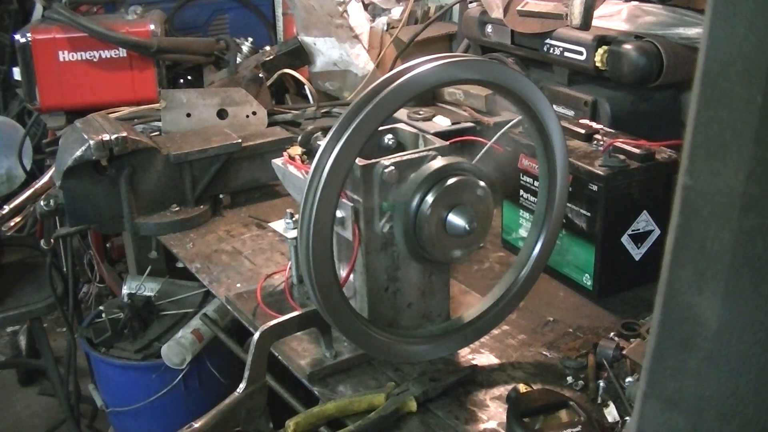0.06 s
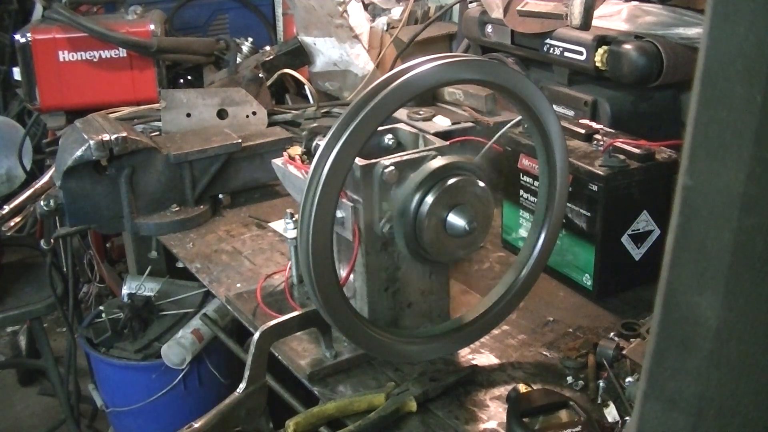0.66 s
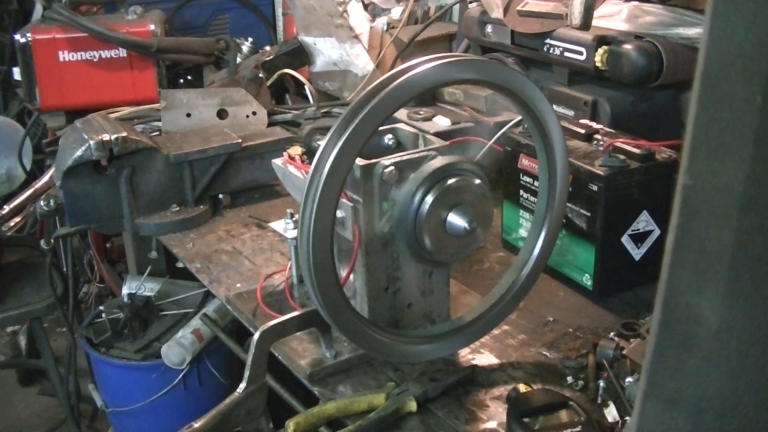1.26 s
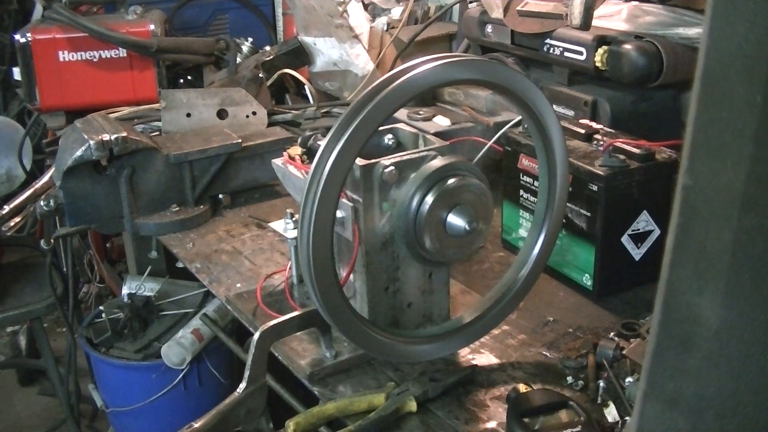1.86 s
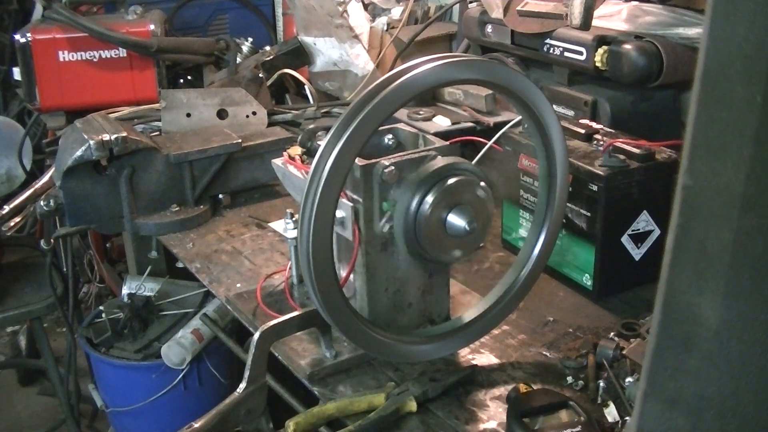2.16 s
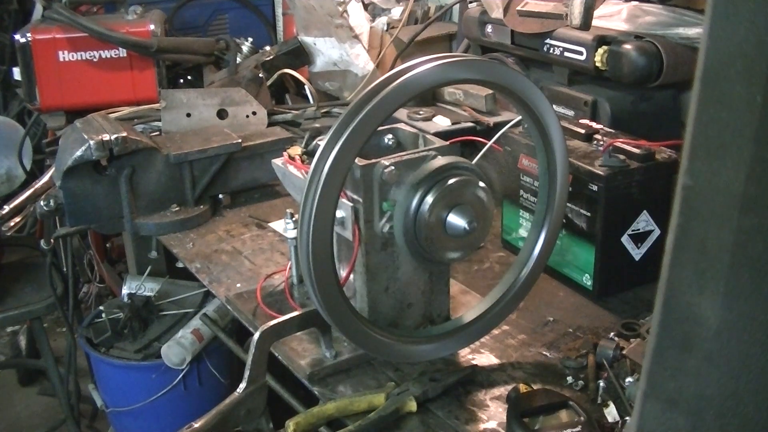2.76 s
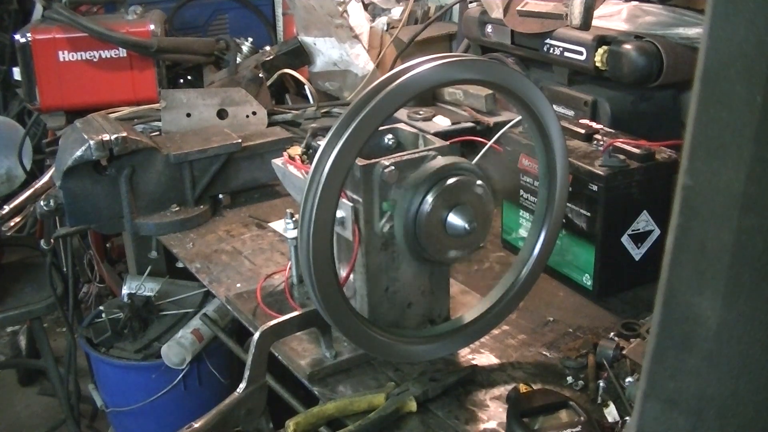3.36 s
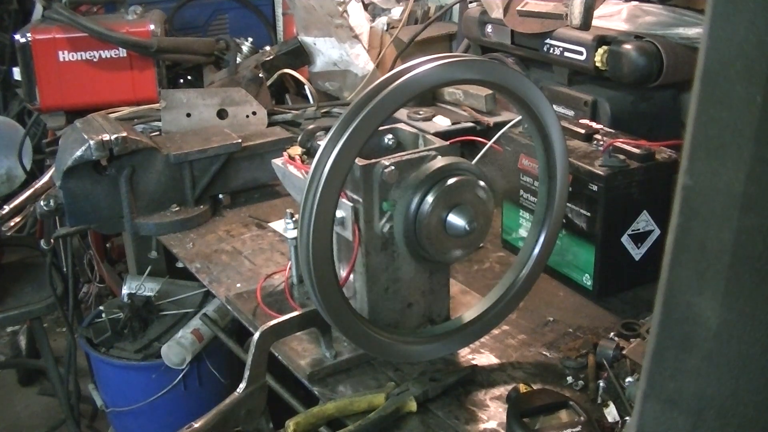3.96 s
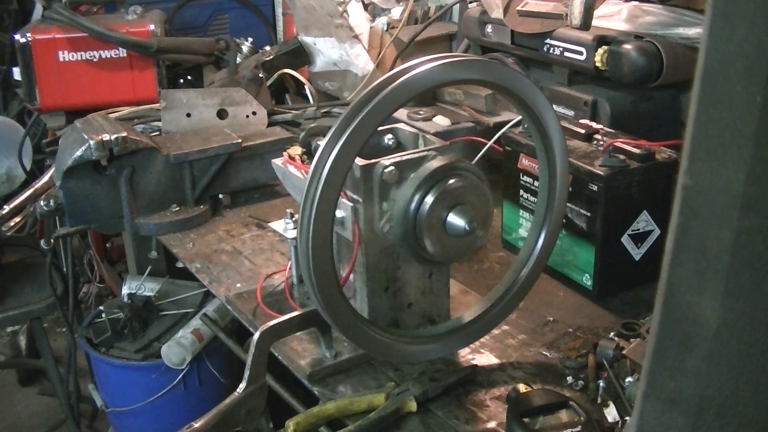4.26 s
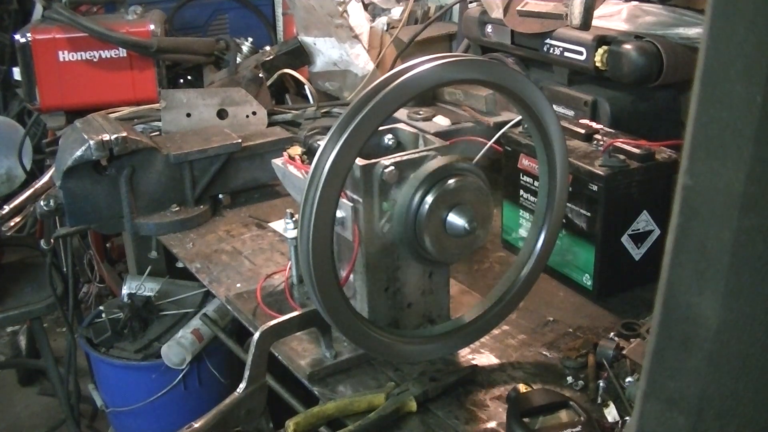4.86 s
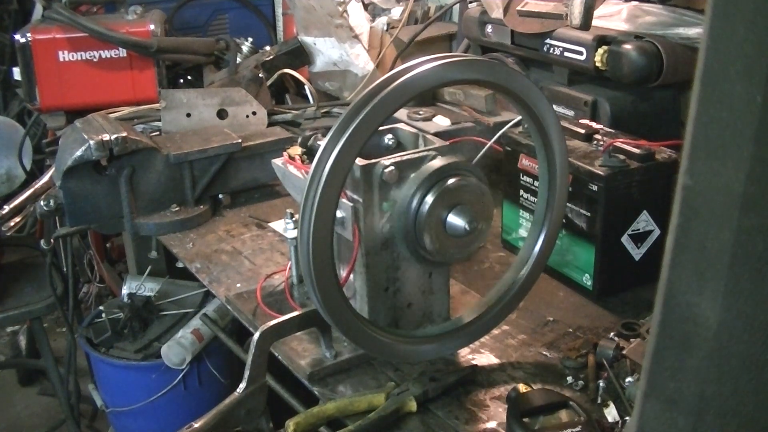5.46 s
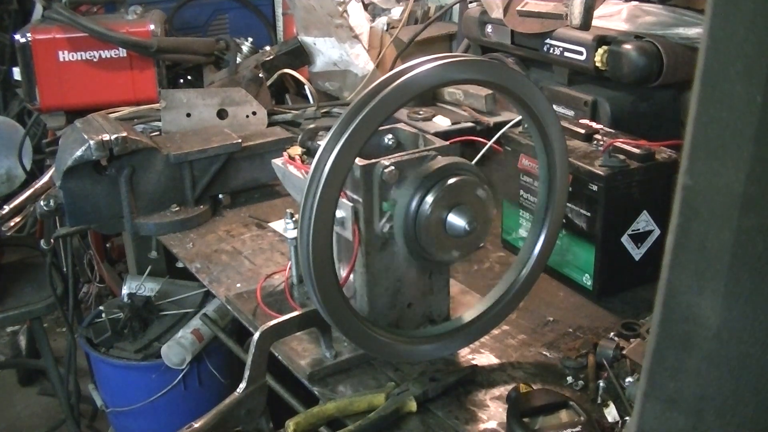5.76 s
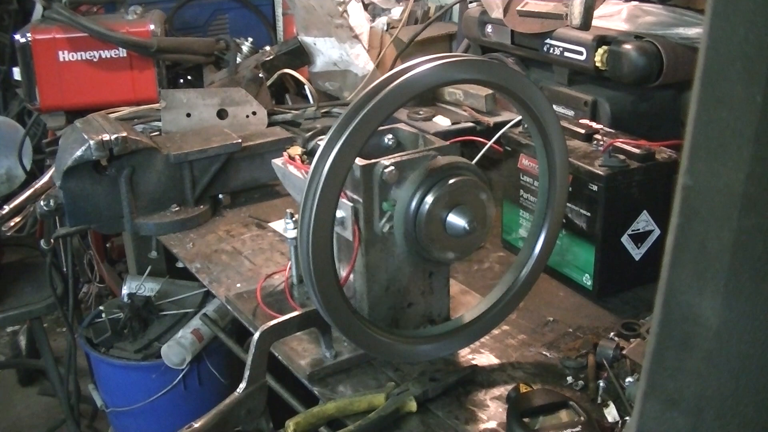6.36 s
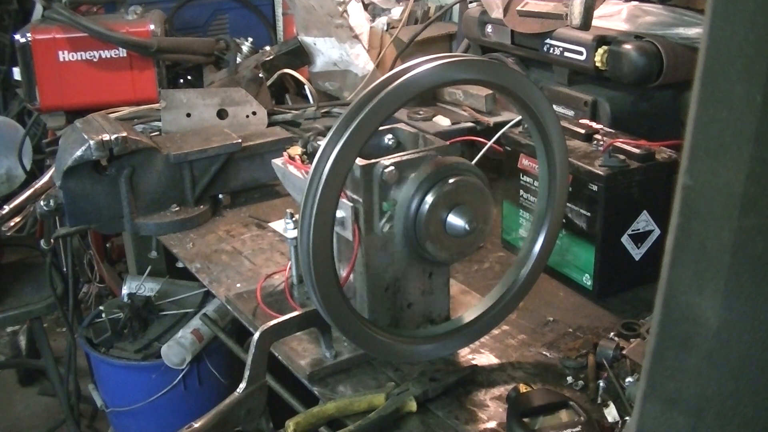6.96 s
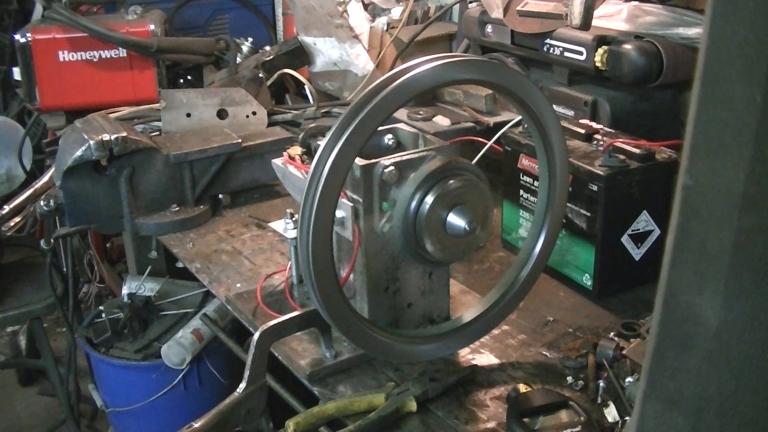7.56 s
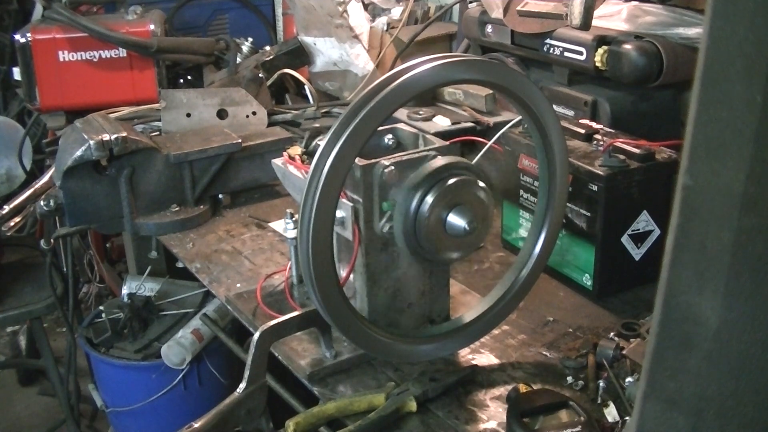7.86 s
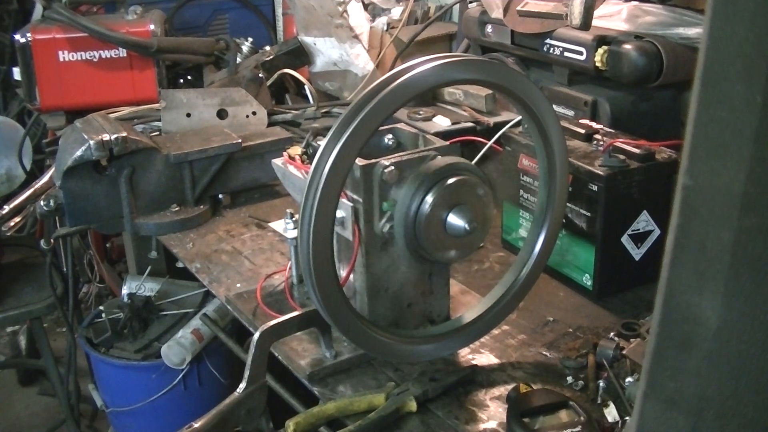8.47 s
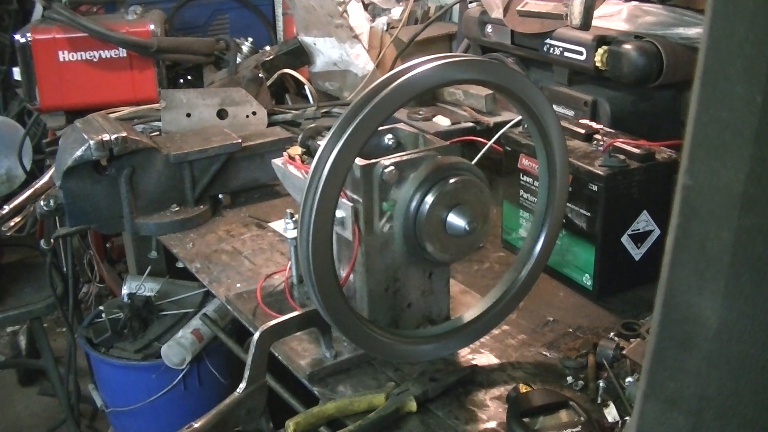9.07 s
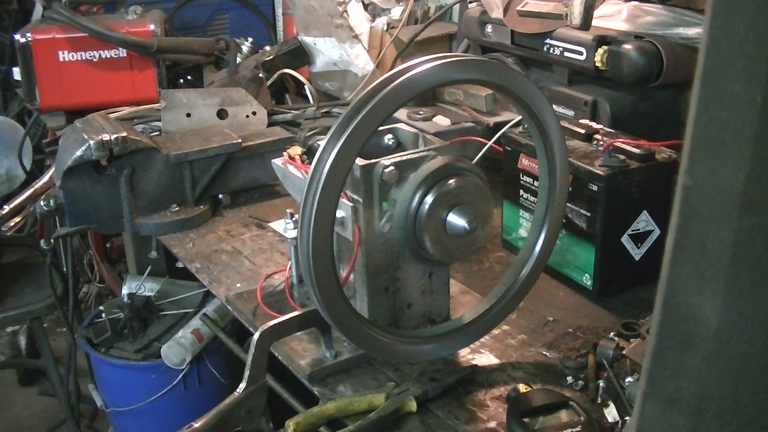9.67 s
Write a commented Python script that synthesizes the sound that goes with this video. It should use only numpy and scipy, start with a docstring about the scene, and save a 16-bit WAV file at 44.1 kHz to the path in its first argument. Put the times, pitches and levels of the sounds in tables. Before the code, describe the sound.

Fast, even mechanical clattering comes from a small flywheel engine close to the microphone. Its steel rods and pins click, rattle and ring on every turn while the bench knocks beneath them. A soft steady whir from the wheel and bearings lies under the clacking, with faint tones swelling and fading. It runs without a break, and the small workshop adds a short echo.

```python
"""A small cluttered workshop: a homemade solenoid engine on the bench turns its flywheel about seven
times a second, slowly gaining speed. Each turn, switch, plunger and loose linkage make the same run of
contacts: one clatter on the pull, one on the return. They knock the bench and ring the steel frame,
rods and pins, and the room answers. Underneath, the wheel whirs and faint pitches swell and fade."""
import sys
import numpy as np
from scipy import signal
from scipy.fft import rfft, irfft, next_fast_len
from scipy.io import wavfile
from scipy.ndimage import uniform_filter1d

SR = 44100
rng = np.random.default_rng(int(sys.argv[2]) if len(sys.argv) > 2 else 0)


def transcribe(signal):
    """Save signal, clipped to [-1, 1], as a 16-bit WAV file at the path in sys.argv[1]."""
    frames = np.atleast_2d(signal).T
    limited = np.clip(frames, -1, 1)
    pcm = np.round(limited * 32767).astype(np.int16)
    wavfile.write(sys.argv[1], SR, pcm)


N = 427769

# Contacts of one turn: switch and pull, return stroke, linkage rattle, light ticks while coasting.
# Each row: delay in seconds, chatter life in seconds, relative levels in dB for bench, frame, rods,
# and pins and clicks, then looseness from 0 to 1.
CONTACTS = [ (-.0006, .0034, -13, -8.5, -1.5, -2.5, 0), (.0013, 0.002, -12, -7.5, 1, -2.5, 0),
            (.0082, .0022, -6, -4, 1.5, 0.5, .2), (0.0125, 0.0034, -4, -3.5, -2, -6.5, 0.4),
            (.0187, 0.0035, -1.5, -2.5, 2.7, 4.5, 0), (.0259, .0023, -3.5, -10, -6, -7, 0.03),
            (0.0343, 0.0037, -7, -6.5, -3, -8, 0), (0.0435, 0.00099, -4.5, -4.5, 3.5, -8, 0),
            (0.0507, .0032, -10.5, -2, -7, -3, 0.1), (0.0538, 0.007, -1.5, 0.5, 0.5, 2.5, 0),
            (0.0654, 0.0022, -2, -5.5, -10, -20, 0.02), (.074, .0044, -8, -7, -6.5, -32, 0),
            (0.0788, 0.0058, -12.5, -4.5, -8.5, -22, 1), (0.0873, .0038, -8.5, -6.5, -14, -27, .8),
            (0.0959, .007, -10, -13, -4.5, -11, .2), (.112, 0.0069, -16.5, -17, -24, -13, 0),
            (.121, .0045, -16, -24, -15, -9, 0.02)]
DELAY_S, LIFE_S, BENCH_DB, FRAME_DB, ROD_DB, CLICK_DB, LOOSENESS = np.transpose(CONTACTS)
TURN_COUNT = 71


def amp(db):
    """Decibels to gain."""
    return 10 ** (np.asarray(db) / 20)


def unit(x):
    """Scaled to rms 1."""
    return x / np.sqrt(np.mean(x ** 2) + 1e-20)


def along(points, hz):
    """(Hz, value) points interpolated on a log frequency axis."""
    knots_hz, values = np.transpose(points)
    return np.interp(np.log(hz + 1), np.log(knots_hz + 1), values)


def filtered(x, response):
    """x through a gain given as a function of Hz."""
    size = next_fast_len(N + SR // 2)
    return irfft(rfft(x, size) * response(np.fft.rfftfreq(size, 1 / SR)), size)[:N]


def ringing(modes, size=16384):
    """Impulse response of a body whose modes alternate in polarity."""
    hz = np.fft.rfftfreq(size, 1 / SR)
    spectrum = 0
    for k, (mode_hz, width_hz, db) in enumerate(modes):
        damping = 1j * hz * width_hz
        spectrum += (-1) ** k * amp(db) * damping / (mode_hz ** 2 - hz ** 2 + damping)
    return irfft(spectrum)


def snap(colour, size=2048):
    """Minimum-phase impulse with this (Hz, dB) colour."""
    gain = amp(along(colour, np.fft.rfftfreq(size, 1 / SR)))
    cepstrum = irfft(np.log(gain))
    cepstrum[1:size // 2] *= 2
    cepstrum[size // 2 + 1:] = 0
    return irfft(np.exp(rfft(cepstrum)))


def turn_starts():
    """Start of each flywheel turn in seconds; each is slightly shorter than the last."""
    first_s, turn_s, quicken_s = -0.06787, 0.139851, 0.0000473
    k = np.arange(TURN_COUNT)
    return first_s + turn_s * k - quicken_s * k * (k - 1) / 2


def contact_times():
    """Seconds, turns x contacts: set crank angles, shifted by switch jitter and wandering joint play."""
    jitter_s, tight_play_s, loose_play_s = 0.0003, 0.0004, 0.0008
    starts_s = turn_starts()
    period_s = np.gradient(starts_s)
    play = rng.standard_normal((TURN_COUNT, len(CONTACTS)))
    wander = unit(uniform_filter1d(play, size=3, axis=0, mode="wrap"))
    closing_s = starts_s + jitter_s * rng.standard_normal(TURN_COUNT)
    crank_s = np.outer(period_s / period_s.mean(), DELAY_S)
    return closing_s[:, None] + crank_s + (tight_play_s + loose_play_s * LOOSENESS) * wander


def contact_forces():
    """Relative dB, turns x contacts: the solenoid's pull varies a little, the loose joints much more."""
    # Slow drift of the pull. Each row: time in seconds, level in dB.
    drift = [(0, -0.6), (1.6, -1.06), (2.25, 0.1), (3.1, -1.3), (4.1, -0.46), (4.7, -1.3), (7.3, -0.4),
             (8.45, -1.5), (9.1, 0.15), (9.7, -1.3)]
    # Times in seconds at which the linkage stays seated and rattles less for one turn.
    seated_s = [1.27, 1.83, 3.08, 4.05, 5.02, 6.12, 7.91, 8.32, 8.46, 9.42]
    pull_spread_db, usual_rattle_db, rattle_spread_db, seated_db = 0.37, 1.5, 2.5, -4.5
    starts_s = turn_starts()
    pull_draw, rattle_draw = rng.standard_normal((TURN_COUNT, 2)).T
    pull_db = np.interp(starts_s, *np.transpose(drift)) + pull_spread_db * pull_draw
    rattle_db = usual_rattle_db + rattle_spread_db * rattle_draw
    rattle_db[np.searchsorted(starts_s, seated_s) - 1] = seated_db
    return pull_db[:, None] + np.outer(rattle_db, LOOSENESS)


def struck(times_s, contact_db, body, chatter_db, life_scale, scatter_db, repeat_share=0, size=1024):
    """A body's sound at rms 1: each contact is one clean blow and a dying chatter of tiny ones."""
    gain = amp(contact_db + scatter_db * rng.standard_normal(times_s.shape))
    age = np.arange(size) / SR / (life_scale * LIFE_S[:, None] + 1 / SR)
    fade = age ** 0.25 * np.exp(-age)
    fade /= np.linalg.norm(fade, axis=1, keepdims=True)
    # The same faces meet each turn, so part of the chatter can repeat.
    repeated = np.sqrt(repeat_share) * rng.standard_normal(fade.shape)
    fresh = np.sqrt(1 - repeat_share) * rng.standard_normal((*times_s.shape, size))
    blows = amp(chatter_db) * (repeated + fresh) * fade
    blows[..., 0] += 1
    onsets = np.round((times_s + 1) * SR).astype(int)  # 1 s lead: the engine is already running
    samples = onsets[..., None] + np.arange(size)
    force = np.bincount(samples.ravel(), (gain[..., None] * blows).ravel(), N + SR)
    return unit(signal.oaconvolve(force, body)[SR:SR + N])


def bench(times_s, force_db, baffle_hz=129):
    """Heavy bench top and base take contacts as knocks; the small board radiates little deep bass."""
    # Each row: resonance in Hz, width in Hz, relative level in dB.
    modes = [(147, 12, -4), (187.26, 6.4, -6), (226.6, 19.8, -5.5), (301, 13.7, 0.5), (347.5, 61, -4),
             (402, 58, -2), (458, 30.7, 2.5), (515, 32, -1), (545, 21.5, 3.5), (597, 24, -7),
             (632.4, 23, -5), (733, 23.5, -2.5), (803.5, 21.4, -0.5), (854.4, 23.9, -4), (878.6, 19, -1),
             (1060, 27, -12.5), (1140, 25, -10), (1332, 100, -16.5), (1430, 27, -11), (1553, 49, -12)]
    knocks = struck(times_s, force_db + BENCH_DB, ringing(modes),
                    chatter_db=-6.5, life_scale=1.44, scatter_db=0.5)
    return filtered(amp(-23) * knocks, lambda hz: 1 / np.sqrt(1 + (baffle_hz / (hz + 1)) ** 8))


def frame(times_s, force_db):
    """The heavy steel frame rings from nearly clean blows."""
    # Each row: resonance in Hz, width in Hz, relative level in dB.
    modes = [(1650, 40, -13), (1808, 34, -.5), (1872, 38, -4), (1940, 17, 2), (1992, 48, -2),
             (2066, 45, -3.5), (2130, 30, -9), (2233, 22, -7)]
    return amp(-24) * struck(times_s, force_db + FRAME_DB, ringing(modes),
                             chatter_db=-6.5, life_scale=0.98, scatter_db=1.5)


def rods(times_s, force_db):
    """The light plunger and rods ring mostly from chatter."""
    # Each row: resonance in Hz, width in Hz, relative level in dB.
    modes = [(2327, 15, 10.5), (2430, 130, -2), (2690, 36, 3.5), (2760, 45, -3), (2940, 90, -12),
             (3080, 36, 0), (3145, 65, 2), (3310, 70, -3), (3490, 70, -1), (3730, 80, -7), (4088, 30, -2.5),
             (4360, 80, -1), (4500, 60, -3), (4558, 55, 4), (4730, 130, -2), (5085, 60, -3),
             (5210, 45, -3.5), (5350, 70, -4), (5590, 54, -6)]
    return amp(-25) * struck(times_s, force_db + ROD_DB, ringing(modes),
                             chatter_db=11.5, life_scale=1.14, scatter_db=1.3, repeat_share=0.041)


def pins(times_s, force_db):
    """Chatter rings the small steel parts in the high treble."""
    # Each row: resonance in Hz, width in Hz, relative level in dB.
    modes = [(6305, 110, 2), (7700, 30, 0), (8036, 95, 2.5), (8650, 70, -2.5), (9120, 73, -0.5),
             (11607, 90, 0), (12450, 140, -0.5), (13400, 90.3, -4)]
    return amp(-32.5) * struck(times_s, force_db + CLICK_DB, ringing(modes),
                               chatter_db=9, life_scale=1, scatter_db=1.7, repeat_share=0.12)


def clicks(times_s, force_db):
    """Hard steel faces meet in short broadband clicks."""
    # Each row: frequency in Hz, relative spectral density in dB.
    colour = [(300, -28), (1100, 4), (2800, -0.5), (3900, 1), (5900, -0.5), (6400, -2.5), (7300, -0.5),
              (9500, -0.5), (10000, -2.5), (11600, 2.5), (12600, -7), (14000, -7), (15200, -9),
              (15800, -12)]
    return amp(-27.3) * struck(times_s, force_db + CLICK_DB, snap(colour),
                               chatter_db=11, life_scale=0.7, scatter_db=1.2, repeat_share=0.25)


def workshop(x, tail_count=12, predelay_s=0.003):
    """Diffuse room tail: the top treble dies first; successive turns cycle through random tails."""
    # Each row: frequency in Hz, time to decay 60 dB in seconds.
    decay = [(150, 0.55), (1000, 0.27), (4000, 0.66), (9000, 0.155), (15000, 0.14)]
    hz, t, noise = signal.stft(rng.standard_normal((tail_count, SR // 3)), SR, nperseg=256)
    t60_s = along(decay, hz)[:, None]
    _, tails = signal.istft(noise * amp(-60 * t / t60_s) / np.sqrt(t60_s), SR, nperseg=256)
    tails /= np.linalg.norm(tails, axis=1, keepdims=True)
    tails = np.pad(tails, ((0, 0), (int(predelay_s * SR), 0)))
    edges = np.round(np.clip(turn_starts() * SR, 0, N - 1)).astype(int)
    wet = np.zeros(N + SR)
    for k, (start, turn) in enumerate(zip(edges, np.split(x, edges[1:]))):
        answer = signal.fftconvolve(turn, tails[k % tail_count])
        wet[start:start + len(answer)] += answer
    return wet[:N]


def faint_rings(waver_db=3, waver_rad=0.54):
    """Single pitches swell and fade under the clatter, wavering from turn to turn."""
    # Each row: middle in seconds, 1/e half length in seconds, pitch in Hz, nominal level in dB.
    swells = [(.25, 0.88, 853, -33), (1.131, .041, 149.5, -30), (2.537, .4, 854, -32),
              (6.548, 0.26, 760, -33), (7.505, 0.18, 508, -26), (7.914, .13, 544.3, -26)]
    t = np.arange(N) / SR
    rings = np.zeros(N)
    for middle_s, half_s, hz, db in swells:
        level, phase = (np.interp(t, turn_starts(), row) for row in rng.standard_normal((2, TURN_COUNT)))
        envelope = amp(db + waver_db * level) * np.exp(-((t - middle_s) / half_s) ** 2)
        rings += envelope * np.sqrt(2) * np.sin(2 * np.pi * hz * t + waver_rad * phase)
    return rings


def whir():
    """The spinning wheel and its bearings make a soft steady rush."""
    # Each row: frequency in Hz, relative spectral density in dB.
    colour = [(25, -40), (42, -38), (55, -17), (100, -11.5), (150, -5), (300, -0.5), (800, -2), (1100, -13),
              (2000, -6.5), (4000, -20), (10000, -19.5), (15800, -24)]
    rush = filtered(rng.standard_normal(N), lambda hz: amp(along(colour, hz)))
    return amp(-28.5) * unit(rush)


def scene():
    """The engine close by, in its room; the same contacts drive every struck part."""
    times_s, force_db = contact_times(), contact_forces()
    engine = sum(part(times_s, force_db) for part in (bench, frame, rods, pins, clicks))
    return (engine + amp(-7) * workshop(engine) + faint_rings() + whir())[None]


def record(dry):
    """Rounds the highest peaks, then cuts the top treble."""
    ceiling, top_hz = 0.85, 15800
    rounded = dry[0] / (1 + np.abs(dry[0] / ceiling) ** 6) ** (1 / 6)
    return filtered(rounded, lambda hz: hz < top_hz)[None]


dry = scene()
out = record(dry)
transcribe(out)
```